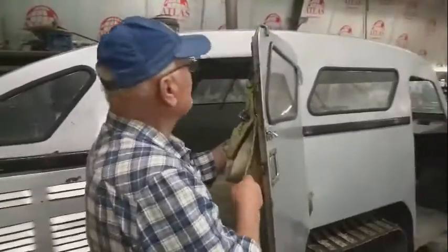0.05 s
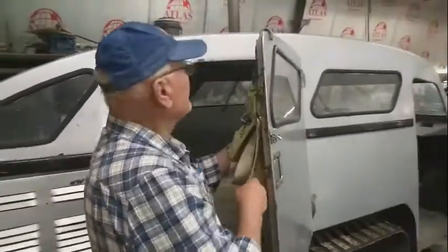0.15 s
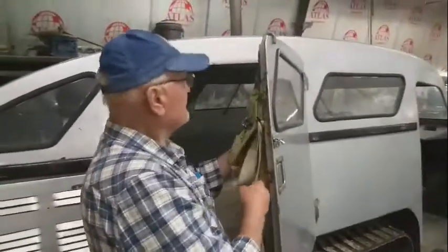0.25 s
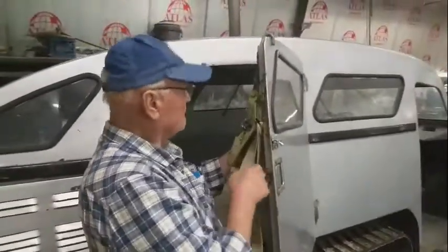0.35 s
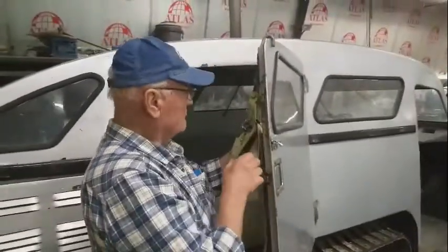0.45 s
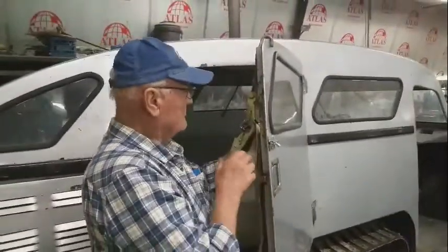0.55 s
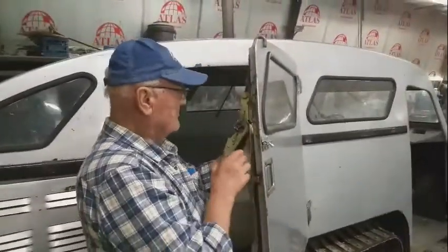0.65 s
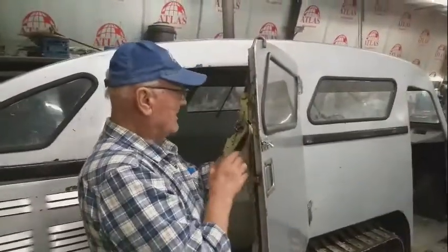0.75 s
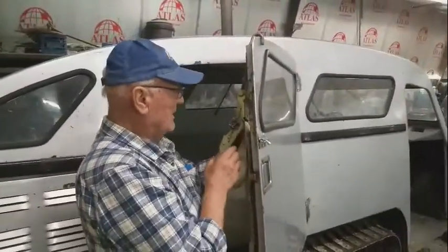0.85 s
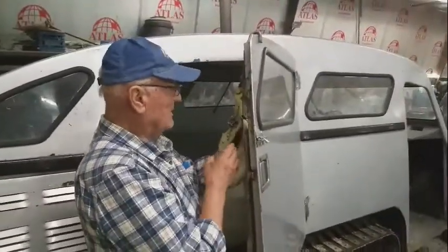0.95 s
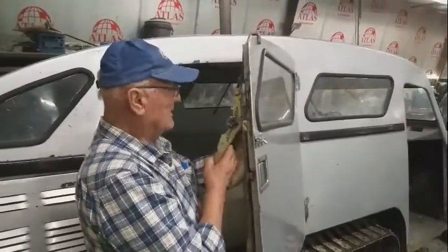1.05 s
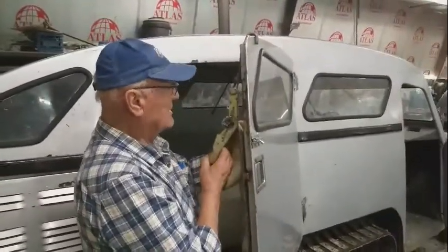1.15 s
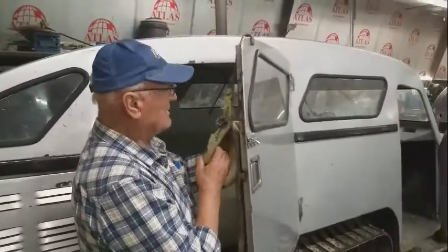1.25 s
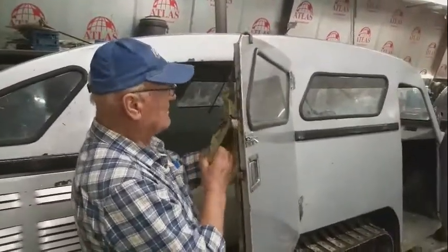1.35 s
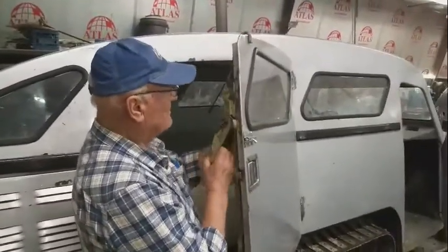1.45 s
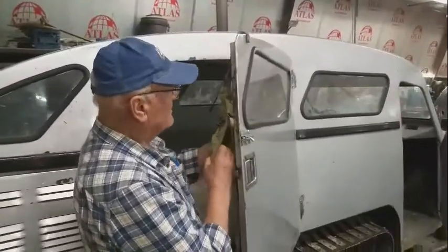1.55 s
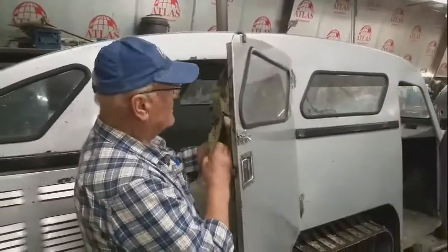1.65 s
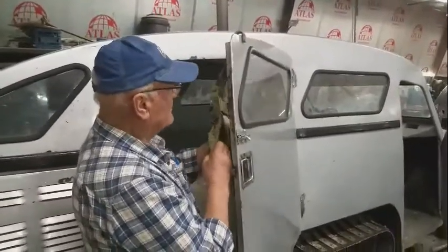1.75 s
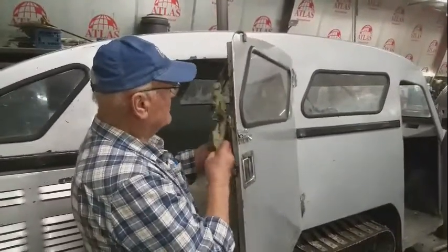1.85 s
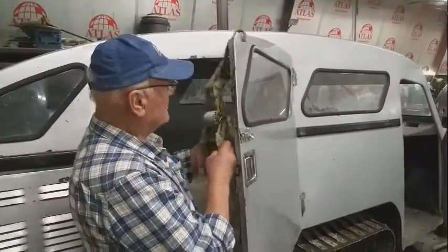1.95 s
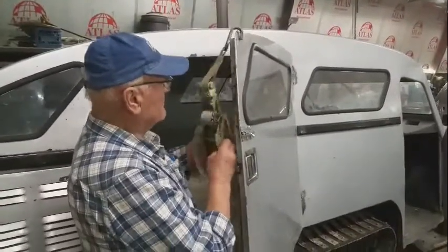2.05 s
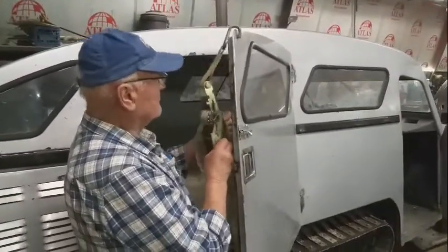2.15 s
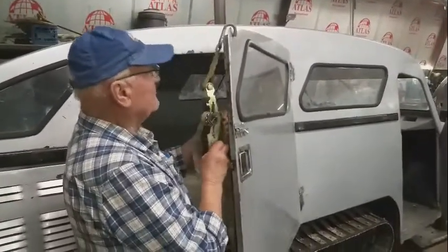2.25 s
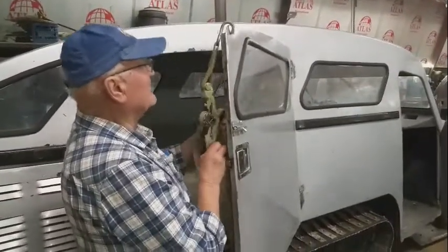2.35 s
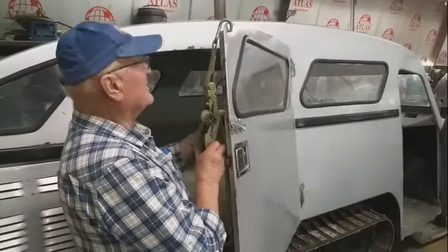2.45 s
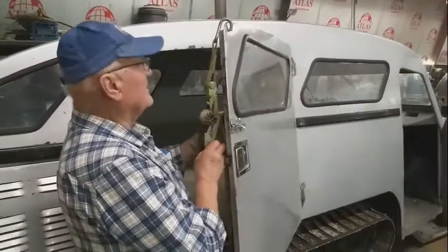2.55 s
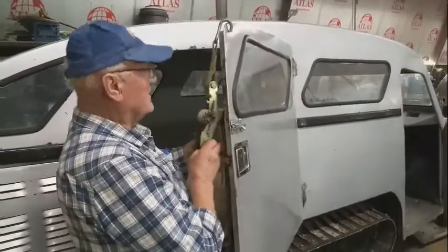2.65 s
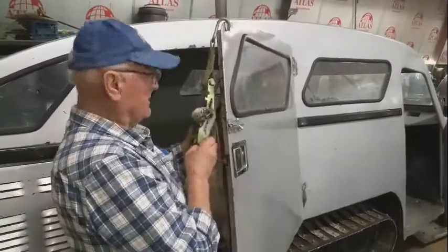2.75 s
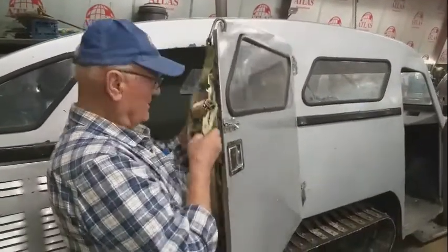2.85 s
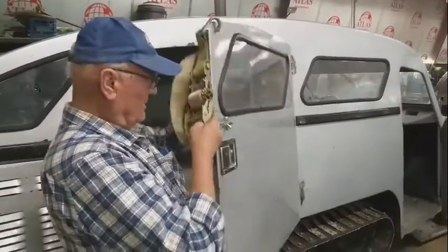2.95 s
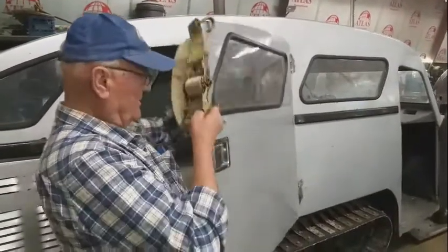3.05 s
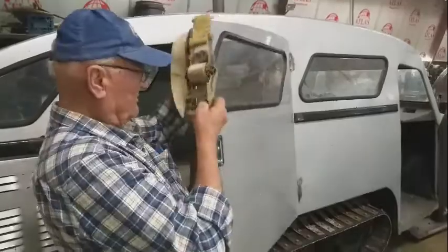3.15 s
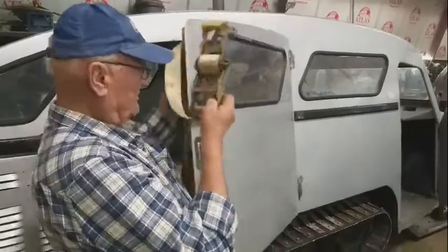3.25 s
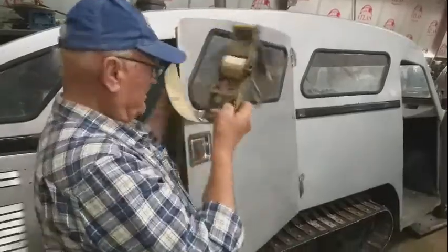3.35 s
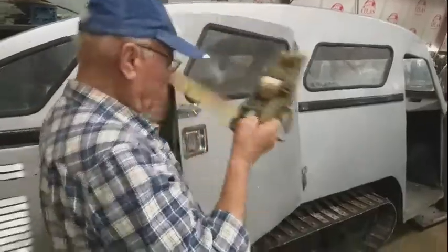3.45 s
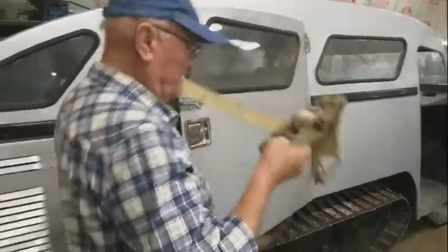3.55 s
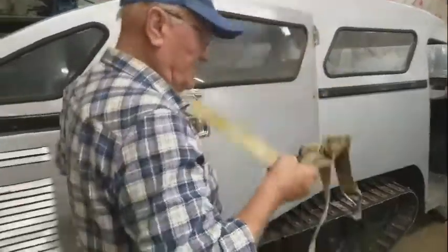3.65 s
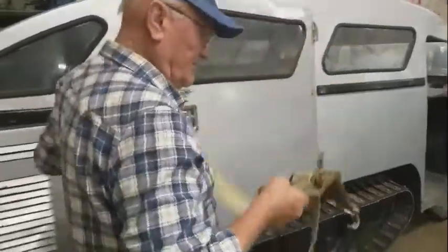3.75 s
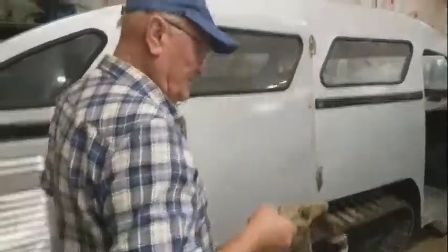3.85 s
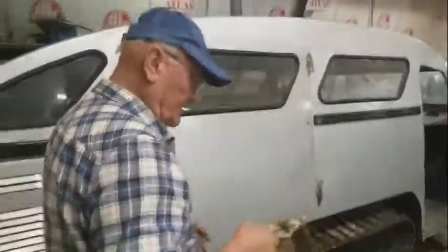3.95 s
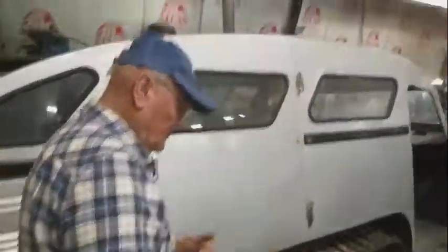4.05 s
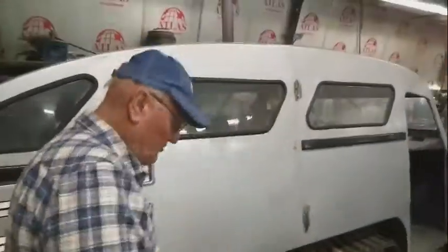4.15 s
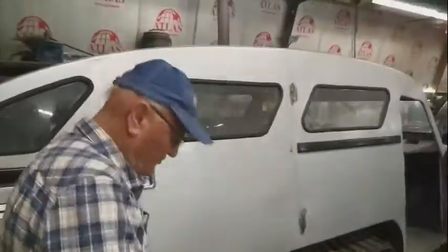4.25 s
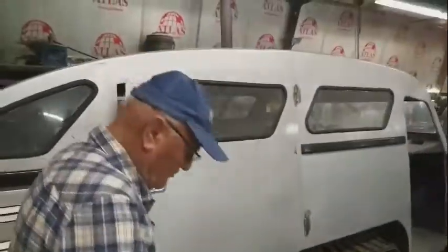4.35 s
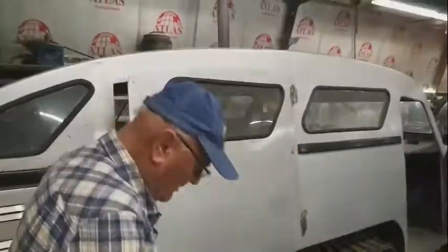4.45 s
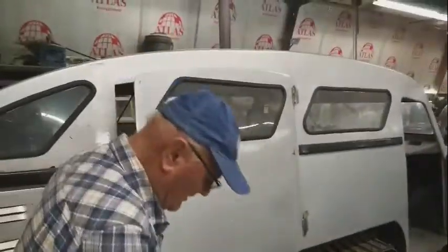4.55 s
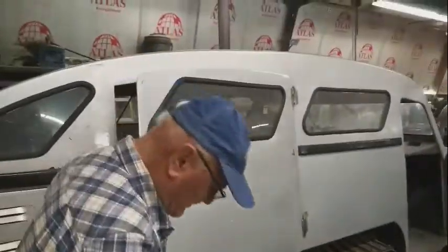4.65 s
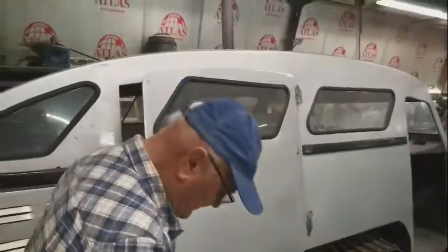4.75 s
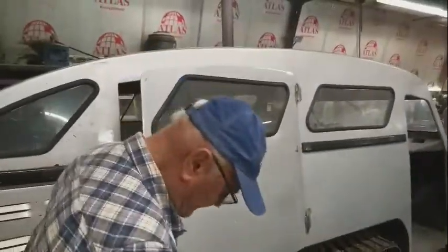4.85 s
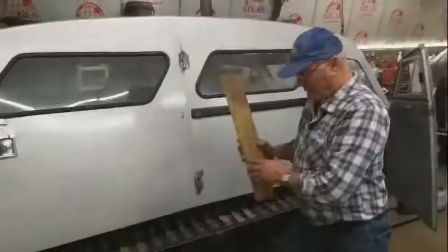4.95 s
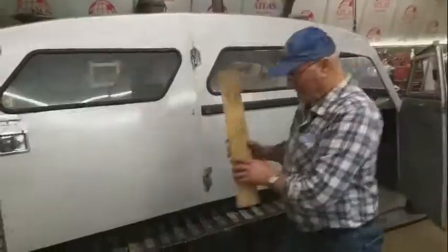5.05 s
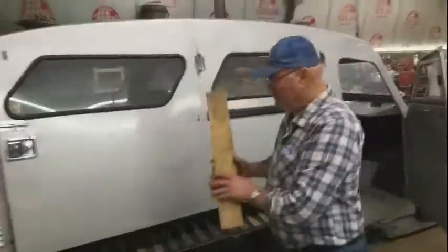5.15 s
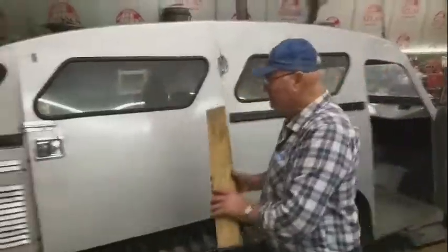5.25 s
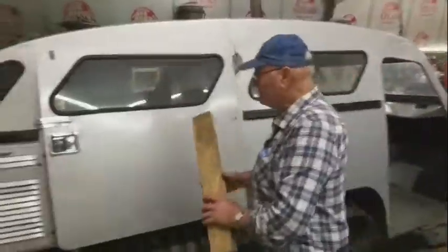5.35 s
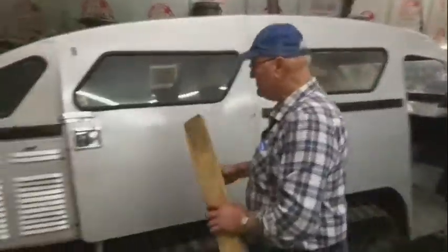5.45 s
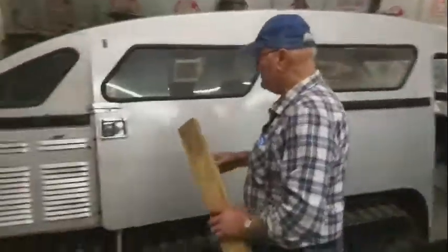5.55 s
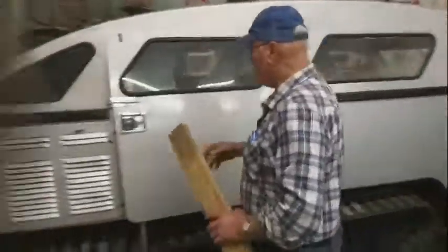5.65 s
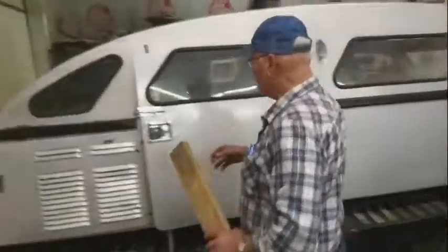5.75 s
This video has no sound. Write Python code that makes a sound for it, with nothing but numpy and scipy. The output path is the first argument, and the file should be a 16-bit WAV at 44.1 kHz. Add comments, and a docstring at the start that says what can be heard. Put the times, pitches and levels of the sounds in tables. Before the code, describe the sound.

Sharp ratchet clicks and metal clanks give way to a clattering, ringing steel hook, a brief dead silence, and faint clothes rustle.

```python
"""A workshop, where a ratchet strap is worked on the door of a tracked vehicle with a humming steel body.
The pawl snaps over the teeth as short damped tones, and the webbing drags and lets go as coloured noise.
Knocks of the ratchet on the body, then thuds as the hook lands, are noise rattles with ringing tones.
The strap is lifted off and its hook strikes and rings with uneven beats. After a short silent break
only the room, rustling clothes and soft scuffs are left, all made from shaped noise."""
import sys
import numpy as np
from scipy import signal
from scipy.fft import rfft, irfft
from scipy.io import wavfile
from scipy.ndimage import uniform_filter1d, minimum_filter1d

SR = 44100
rng = np.random.default_rng(int(sys.argv[2]) if len(sys.argv) > 2 else 0)


def materialize(psi):
    """Save the field psi as 16-bit PCM at rate SR to the path in sys.argv[1].

    A 1-D psi becomes a single channel; in a 2-D psi each row is a channel.
    """
    bounded = np.clip(np.atleast_2d(psi).T, -1, 1)
    quanta = np.round(bounded * 32767).astype(np.int16)
    wavfile.write(sys.argv[1], SR, quanta)


N = 255339
T = np.arange(SR) / SR  # seconds within one sound
CLOCK = np.arange(N) / SR  # seconds within the whole scene

# In the tables, t60 is the time to fade by 60 dB, and tone levels are relative.

# Tone of the quiet workshop. Each row: pitch in Hz, level in dB.
FLOOR_TONE = [(18, -80), (30, -16), (141, 1.5), (486, -18.5), (844, -21.5), (1320, -36), (1910, -13),
              (2480, -26), (4300, -17), (8080, -16.5), (9710, -27), (16000, -40)]
FLOOR_DB = -61.5
# How long the room rings, before scaling. Each row: pitch in Hz, t60 in seconds.
ROOM_T60 = [(100, 0.97), (250, 1), (600, 0.62), (1500, 0.51), (3000, 0.49), (6000, 0.32), (8500, 0.37),
            (15000, 0.033)]

# Soft scuffs of hands and shoes. Each row: start in seconds, level in dB, fade time in seconds.
SCUFFS = [(5.035, -57.5, 0.11), (5.166, -67.5, 0.029), (5.406, -55, 0.051)]
# Tone of the scuffs. Each row: pitch in Hz, level in dB.
SCUFF_TONE = [(300, -11), (1200, -8.5), (1800, 7.5), (2300, -3), (3000, -37), (9000, -31)]
# Webbing and sleeves brush past.
# Each row: middle in seconds, half length in seconds, level in dB, brightness in dB per octave.
RUBS = [(0.01, 0.082, -41, -2), (1.581, 0.0074, -43.5, 15.5), (1.676, .007, -51.5, 5),
        (2.06, 0.085, -45, 1.5), (3.427, 0.36, -50.5, -2), (3.647, 0.09, -43.5, -5),
        (3.79, 0.076, -51, 4.5), (3.903, 0.025, -45, 5.5), (3.994, 0.16, -51.5, 3),
        (4.696, 0.055, -48, 4.5), (5.021, 0.014, -54, 13), (5.095, 0.06, -58.5, 14), (5.193, 0.027, -51, 9),
        (5.369, 0.16, -56.5, 3.5), (5.79, 0.17, -53, 4)]
# Tone of the cloth before that brightness. Each row: pitch in Hz, level in dB.
CLOTH_TONE = [(150, -26), (300, -6), (800, -6.5), (1200, -6), (1800, 5), (2700, -2.5), (4000, 5.5),
              (6000, -3.5), (8200, 0), (10000, -19.5), (13000, -13), (16000, -21)]

# Steel panels of the body. Each row: pitch in Hz, level in dB, t60 in seconds before scaling.
PANELS = [(152, -18, .9), (176, -21, .7), (237, -22, .6), (260, -18, .95), (322, -21, .6), (411, -16, .6),
          (541, -15, .65), (677, -14, .6), (860, -19, .5), (1075, -20, .5), (1385, -19, .5),
          (1612, -17, .5), (1735, -18, .5)]
# The strap tugs at the body. Each row: start in seconds, end in seconds, level in dB.
PULLS = [(0.201, 1.639, -52.5), (2.146, 2.55, -46), (3.5, 3.776, -44), (3.796, 4.02, -54.5)]
# Tone of the panel hum. Each row: pitch in Hz, level in dB.
HUM_TONE = [(150, 0), (260, 0.5), (400, -10.5), (700, -15.5), (1500, -30.5)]

# The webbing drags round the spool, then lets go.
DRAG_FROM_S, DRAG_TO_S = 1.848, 1.962
DRAG_ATTACK_S, DRAG_RELEASE_S = 0.0094, 0.015
HISS_DB, HISS_DB_PER_S = -40, -38  # the spool hisses at once and eases off
GROAN_DB, GROAN_DB_PER_S = -29.5, 290  # the webbing groans ever louder up to this level
# Tone of the spool's hiss. Each row: pitch in Hz, level in dB.
HISS_TONE = [(1500, -17.5), (4000, -10), (7000, -15.5), (8300, 4.5), (9000, -13), (10000, -39.5),
             (16000, -31)]
# Tone of the webbing's groan. Each row: pitch in Hz, level in dB.
GROAN_TONE = [(60, -38), (250, -13), (600, -6.5), (1100, -7.5), (1900, -13), (3500, -19.5), (9000, -44)]

# Knocks of the ratchet on the body, then thuds as the hook lands on the track or floor.
# Each row: start in seconds, level in dB, hardness in dB per octave, boom in the bass in dB,
# length of the rattle in seconds before scaling.
KNOCKS = [(1.962, -14, -1, -9.5, 0.032), (1.985, -24, 1, 1.5, 0.0037), (2.824, -26.5, 0.5, -2.5, 0.00077),
          (2.844, -35, -7, -6, 0.014), (2.892, -26.5, 7, -10, 0.023), (2.898, -13.5, 0.9, 1, 0.0045),
          (2.922, -28.5, -2, -5, 0.015), (3.027, -26.5, -3, -3, 0.018), (3.101, -22.5, 1.27, -1.5, 0.0055),
          (3.483, -18.5, -0.7, -2, .05), (4.128, -27.5, 1, 11.5, 0.039), (4.422, -32.5, 5, -7, 0.013)]
# Tone of a knock or thud before hardness and boom. Each row: pitch in Hz, level in dB.
KNOCK_TONE = [(29, -69.5), (50, -37.5), (85, -22.5), (148, -7), (380, -4), (408, -9.5), (472, -8),
              (545, -3), (802, -6.5), (1430, -6), (2110, -8), (6870, -15.5), (8540, -13.5), (10100, -31.5),
              (16000, -29)]
PIVOT_HZ, HARD_TOP_HZ = 1500, 4300  # hardness tilts the tone about the pivot, up to its top
BOOM_HZ, BOOM_END_HZ = 300, 700  # the boom fades out between these
DEEP_HZ, DEEP_GROWTH = 80, 1.2  # the deepest bass follows the boom this many times as strongly
SOFT_RING, RING_LOSS = 1, 0.043  # ring time as a factor; how fast it shrinks per dB per octave of hardness
# The clack within each hook strike: dB against the strike, dB per octave, seconds before scaling.
CONTACT_DB, CONTACT_HARDNESS, CONTACT_S = -26.5, 9.14, 0.004

# The ratchet frame rings as it comes free. Each row: start in seconds, level in dB.
FRAME_RINGS = [(2.9, -58), (3.101, -41)]
# Tones of the frame. Each row: pitch in Hz, level in dB, t60 in seconds.
FRAME_MODES = [(3773, 1, 1), (4974, 12.5, 0.366), (6255, -16, 0.35), (7010, -34, 0.11), (8140, -5.5, 0.88),
               (12560, -7, 0.2)]
TING_S = 3.5
# The hook tings as it slips off the door. Each row: pitch in Hz, level in dB, t60 in seconds.
TING_MODES = [(5900, -32, 0.36), (8100, -34, 0.243)]

# Hook strikes. Each row: start in seconds, level in dB, place struck from 0 (tip) to 1 (shank),
# brightness in dB per octave.
STRIKES = [(4.014, 4.5, 0.17, 2.5), (4.136, -1.5, 0.4, -0.5), (4.368, 0, 1, 3), (4.532, -9, 1, 3)]
# Pitches at which the hook rings, each in Hz.
HOOK_HZ = [2055, 2530, 2660, 4113, 4662, 5114, 5553, 5914, 7536, 9082, 9497, 11012, 12660, 13510, 13730,
           14545, 14885]
# The same hook tones. Each row: dB when struck at the tip, dB when struck at the shank, t60 in seconds.
HOOK_MODES = [(-8.5, -15.5, 0.92), (-33.5, -17, 0.93), (-30.5, -23, 1), (-43.5, -48, 1.1), (-34, -30, 1.4),
              (-11.5, -9.5, 0.8), (-45, -32, 1.5), (-23.5, -17.5, 0.83), (-21.5, -16.5, 1.17),
              (-23.5, -27, 0.35), (-31, -33.5, 0.16), (-57, -35.5, 0.55), (-59, -45.5, .35),
              (-45.5, -39, 0.46), (-35.5, -49, .3), (-54, -47, 0.66), (-52, -47.5, .5)]
# Just after its third strike the hook's ringing fades faster.
# The row: start in seconds, extra loss in dB a second.
FASTER_FADE = (4.383, 43.4)

# The pawl drops on a tooth. Each row: start in seconds, strength in dB.
SNAPS = [(0.182, 5), (0.2764, -8), (0.364, -10.5), (0.4216, -8.5), (0.4581, -18.5), (0.505, -24.5),
         (0.543, -11.5), (0.581, -27.5), (0.6274, -15), (0.7121, -14), (0.7705, -26), (0.832, -13.5),
         (0.8903, -11.5), (0.9807, -10), (1.076, -9.5), (1.1806, -12), (1.253, -9), (1.3914, -22),
         (1.5735, -34), (1.6715, -61), (2.0005, -5), (2.271, -18.5), (2.3954, -19), (2.5114, -0.5),
         (2.6262, -1.5), (2.8985, -5), (3.032, -21.5)]
# Pawl resonances. Each row: middle pitch in Hz, nominal width in Hz, level in dB.
PAWL_MODES = [(2900, 690, -3), (4000, 970, 2), (5950, 2000, 2.5), (7120, 530, -2.5), (7520, 170, -7.5),
              (8267, 690, 10), (12600, 1500, -40.5)]
# Tone of the noise that follows each snap. Each row: pitch in Hz, level in dB.
SNAP_TONE = [(59, -38), (100, -24.5), (166, -6.5), (471, -9), (535, -0.5), (608, -8.5), (691, -4.5),
             (1100, -6.5), (1230, -6.5), (2750, 0), (5080, -7.5), (8110, -2), (10000, -20), (13500, -13),
             (16000, -15)]
# What each snap leaves ringing in the side plates. Each row: pitch in Hz, level in dB, t60 in seconds.
PLATES = [(1667, -20, .5), (1766, -21, .5), (2719, -18, .35), (2831, -14, .35), (3743, -16, .2),
          (3945, -13, .2), (7281, -9, .08), (8077, -6, .08), (8361, -4, .08)]
# Once the webbing has let go, a hand covers the pawl and dims its direct sound.
SHADED_FROM_S, SHADE_DB = 2.1, -5
WASH_DB, WASH_GROWTH = -21, 0.69  # ring after a snap of 0 dB; dB it gains per dB of strength
TOP_DB, FIRM_DB, TOP_LOSS = 3.5, -8.5, 1  # its top treble; below a firm snap it loses this many dB per dB

# What differs between the two microphone ports. Each row: pitch in Hz, dB against the middle.
PORT_GAP = [(100, -56.5), (600, -58), (1200, -28.5), (2050, -12), (3000, -30.5), (5100, -36.5), (7500, -24),
            (12000, -27)]
# How far the hook leans to the left. Each row: pitch in Hz, dB against the hook's ringing.
HOOK_LEAN = [(1000, -40.5), (2050, -18), (3000, -30), (5100, -52)]
# The sound drops out. The row: start in seconds, end in seconds.
BREAK = (4.855, 4.968)
EDGE_HZ = 16000  # upper edge of what is heard


def amp(db):
    """Turns decibels into a gain."""
    return 10 ** (np.asarray(db) / 20)


def unit(x):
    """Scales a sound to an average strength (rms) of 1."""
    return x / np.sqrt(np.mean(x ** 2) + 1e-20)


def read(points, hz):
    """Reads a table between its rows, on a logarithmic pitch axis as in hearing."""
    f, value = np.transpose(points)
    return np.interp(np.log(hz + 1), np.log(f + 1), value)


def add(mix, s, sound):
    """Mixes a sound in at time s, cut off at the end of the scene."""
    part = mix[max(round(s * SR), 0):][:len(sound)]
    part += sound[:len(part)]


def colour(x, tone):
    """Makes each pitch louder or softer by a table of (Hz, dB)."""
    hz = np.fft.rfftfreq(len(x), 1 / SR)
    return irfft(rfft(x) * amp(read(tone, hz)), len(x))


def noise(tone, size):
    """Random hiss shaped by a table of (Hz, dB), with rms 1."""
    return unit(colour(rng.standard_normal(size), tone))


def swell(seconds):
    """A gain that rises smoothly from 0 towards 1."""
    return 1 - np.exp(-T / seconds)


def die_away(x, factor=1):
    """Lets each pitch band fade with the decay of the workshop, its ring time scaled by factor."""
    hz, t, bands = signal.stft(x, SR, nperseg=256)
    t60 = factor * read(ROOM_T60, hz)[:, None]
    return signal.istft(bands * amp(-60 * t / t60), SR, nperseg=256)[1][:len(x)]


def ring(modes):
    """Struck metal as a sum of fading sine tones, from rows of (Hz, dB, t60)."""
    return sum(amp(db - 60 * T / t60) * np.sin(2 * np.pi * (hz * T + rng.random()))
               for hz, db, t60 in modes)


def catches(grain_db):
    """The uneven grip of sliding fabric, as a gain that wavers at random."""
    return amp(grain_db * unit(uniform_filter1d(rng.standard_normal(N), size=260)))


def workshop_floor():
    """The quiet workshop: steady shaped noise."""
    return amp(FLOOR_DB) * noise(FLOOR_TONE, N)


def scuffs():
    """Friction of hands and shoes: short dull noises that swell and fade."""
    out = np.zeros(N)
    for s, db, length in SCUFFS:
        add(out, s, amp(db) * noise(SCUFF_TONE, SR) * np.exp(-T / length) * swell(0.0043))
    return out


def rubbing():
    """Webbing and sleeves brush past: each rub is noise that swells and fades, roughened by small catches."""
    out = np.zeros(N)
    for s, half_length, db, bright_db in RUBS:
        tone = [(hz, level + bright_db * np.log2(hz)) for hz, level in CLOTH_TONE]
        cloth = np.resize(noise(tone, SR), N)  # one second of noise, repeated
        out += amp(db) * np.exp(-((CLOCK - s) / half_length) ** 2) * cloth
    return out * catches(grain_db=1.0)


def panel_hum(ring_share=0.45):
    """Small random jerks of the strap keep the low tones of the steel panels sounding."""
    out = np.zeros(N)
    panels = ring([(hz, db + read(HUM_TONE, hz), t60 * ring_share) for hz, db, t60 in PANELS])
    panels = panels / np.linalg.norm(panels)
    for start, end, db in PULLS:
        jerks = rng.standard_normal(round((end - start) * SR))
        add(out, start, amp(db) * signal.fftconvolve(jerks, panels))  # every jerk starts a ring
    return out


def drag():
    """The webbing slips round the spool: a metal hiss, and a groan that grows until it lets go."""
    age = np.clip(CLOCK, DRAG_FROM_S, DRAG_TO_S) - DRAG_FROM_S
    attack = 1 - np.exp(-age / DRAG_ATTACK_S)
    release = np.exp(-np.maximum(CLOCK - DRAG_TO_S, 0) / DRAG_RELEASE_S)
    hiss = amp(HISS_DB + HISS_DB_PER_S * age) * noise(HISS_TONE, N)
    time_left = DRAG_TO_S - DRAG_FROM_S - age
    groan = amp(GROAN_DB - GROAN_DB_PER_S * time_left) * noise(GROAN_TONE, N)
    return attack * release * (hiss + groan) * catches(grain_db=1.1)


def knock(hardness, boom_db, length, room_db=-5, panel_db=-1, rattle_db=-1, grit_db=4, rise=0.17,
          panel_ring=0.98):
    """A quick rattle of contacts with ringing panel tones and room; hard ones are brighter and die sooner."""
    hz = np.geomspace(20, 20000, 40)
    tilt_db = hardness * np.log2(np.minimum(hz, HARD_TOP_HZ) / PIVOT_HZ)
    boom = [(DEEP_HZ, DEEP_GROWTH * boom_db), (BOOM_HZ, boom_db), (BOOM_END_HZ, 0)]
    tone = np.column_stack([hz, tilt_db + read(boom, hz)])
    lasting = SOFT_RING * np.exp(-RING_LOSS * max(hardness, 0))

    # the strength of the contacts jumps every 40 samples
    grit = np.repeat(amp(grit_db * rng.standard_normal(SR)), 40)[:SR]
    contacts = unit(colour(rng.standard_normal(SR) * grit, KNOCK_TONE))
    rattle = colour(contacts, tone) * np.exp(-(T / (1.24 * length)) ** 2) * swell(rise * length)

    room = die_away(colour(noise(KNOCK_TONE, SR), tone), lasting) * swell(0.5 * length)
    modes = [(f, db + read(tone, f), t60 * lasting * panel_ring) for f, db, t60 in PANELS]
    panels = ring(modes) * swell(0.0074)
    return amp(rattle_db) * rattle + amp(room_db) * room + amp(panel_db) * panels


def knocks():
    """Knocks of the ratchet on the body, thuds as the hook lands on the track or floor, and hook clacks."""
    out = np.zeros(N)
    for s, db, hardness, boom_db, length in KNOCKS:
        add(out, s, amp(db) * knock(hardness, boom_db, length))
    for s, db, _, _ in STRIKES:
        add(out, s, amp(db + CONTACT_DB) * knock(CONTACT_HARDNESS, 0, CONTACT_S))
    return out


def coming_free():
    """Fading metal tones: the ratchet frame rings as it comes free, the hook tings as it slips off."""
    out = np.zeros(N)
    for s, db in FRAME_RINGS:
        add(out, s, amp(db) * ring(FRAME_MODES))
    add(out, TING_S, ring(TING_MODES) * swell(0.02))
    return out


def ringing_envelope(t, hz, tip_db, shank_db, t60):
    """Strength of one hook tone: energies of all strikes add up, and fade faster just after the third."""
    power, octaves = 0, np.log2(hz / HOOK_HZ[0])
    for s, db, place, bright_db in STRIKES:
        age = np.maximum(t - s, 0)
        blow_db = db + tip_db + place * (shank_db - tip_db) + bright_db * octaves
        power = power + (amp(blow_db - 60 * age / t60) * (1 - np.exp(-age / 0.0039))) ** 2
    faster_from_s, loss_db_per_s = FASTER_FADE
    return np.sqrt(power) * amp(-loss_db_per_s * np.maximum(t - faster_from_s, 0))


def hook(level_db=-1, swing_hz=13, echo_share=0.74, blur_db=-16):
    """The steel hook rings; as it swings, echoes slide against the direct sound and tones beat unevenly."""
    offset_hz = np.fft.fftfreq(SR, 1 / SR)
    out, start = np.zeros(N), STRIKES[0][0]
    for hz, mode in zip(HOOK_HZ, HOOK_MODES):
        shift_hz = swing_hz * np.sqrt(hz / HOOK_HZ[0])  # higher tones beat faster
        slow_beats = 1 / (1 + (offset_hz / shift_hz) ** 4)
        fast_beats = amp(blur_db) / (1 + (offset_hz / 70) ** 2)
        random_phase = np.exp(2j * np.pi * rng.random(SR))
        echoes = np.fft.ifft((slow_beats + fast_beats) * random_phase)
        echo_level = echo_share * (hz / HOOK_HZ[0]) ** 0.86
        paths = 1 + echo_level * echoes / np.std(echoes)
        # even out the slow changes, so beats move the energy about but keep its sum
        paths /= np.sqrt(uniform_filter1d(abs(paths) ** 2, size=5000))
        tone = (paths * np.exp(2j * np.pi * hz * T)).real
        add(out, start, amp(level_db) * ringing_envelope(T + start, hz, *mode) * tone)
    return out


def ping(hz, width):
    """A heavily damped resonance that swells and dies quickly; the wider it is, the shorter."""
    t = T[:800]
    age = np.pi * width * t
    return age ** 2 * np.exp(-1.4 * age) * np.sin(2 * np.pi * hz * (t - 0.001))


def pawl(snap_db=1.5, plate_db=-2, early_db=4, early_s=0.012, echo_db=-6, echo_s=0.003, spread=0.0033,
         same=0.86):
    """The sprung pawl drops on a tooth: a bright snap, a quick echo of it, and a wash of side plates and room."""
    out = np.zeros(N)
    paths = noise(SNAP_TONE, SR)  # most echo paths stay alike from snap to snap
    for s, strength_db in SNAPS:
        db = strength_db + SHADE_DB * (s > SHADED_FROM_S)
        snap = sum(amp(mode_db) * ping(hz * (1 + spread * rng.standard_normal()), width)
                   for hz, width, mode_db in PAWL_MODES)
        snap *= amp(db + snap_db) / abs(snap).max()
        add(out, s, snap)
        echo_delay_s = echo_s * (1 + 0.064 * rng.standard_normal())
        add(out, s + echo_delay_s, amp(echo_db) * snap)

        room = die_away(np.sqrt(same) * paths + np.sqrt(1 - same) * noise(SNAP_TONE, SR))
        top_db = TOP_DB - TOP_LOSS * max(FIRM_DB - db, 0)  # weak snaps have less top treble
        room = colour(room, [(9000, 0.0088), (11000, top_db)])
        room *= (1 + amp(early_db) * np.exp(-T / early_s)) / 2  # stronger at first
        wash = room + amp(plate_db) * ring(PLATES) / 2
        add(out, s, amp(WASH_DB + WASH_GROWTH * strength_db) * wash * swell(0.0069))
    return out


def scene():
    """All sources sit near the middle; the hook's lowest ring leans left. Strap work ends in the break."""
    working = CLOCK < BREAK[1] - 0.02
    ringing = hook() * working
    strap = (panel_hum() + drag() + knocks() + coming_free() + pawl()) * working
    middle = workshop_floor() + scuffs() + rubbing() + strap + ringing
    port_gap = signal.hilbert(colour(middle, PORT_GAP)).imag  # a small phase gap between the ports
    side = port_gap + colour(ringing, HOOK_LEAN)
    return np.array([middle + side, middle - side])  # left, right


def record(dry, low_cut_hz=35):
    """Bass cut, a fast limiter that holds peaks at full scale, the silent break, and the treble limit."""
    dry = signal.sosfilt(signal.butter(2, low_cut_hz, "high", fs=SR, output="sos"), dry)
    allowed = np.minimum(1 / (abs(dry).max(0) + 1e-9), 1)
    gain = uniform_filter1d(minimum_filter1d(allowed, size=300), size=300)
    outside_break = (CLOCK < BREAK[0]) | (CLOCK > BREAK[1])
    running = uniform_filter1d(outside_break.astype(float), size=90)  # soft edges
    treble_limit = signal.firwin(511, EDGE_HZ, window=("kaiser", 9), fs=SR)
    return signal.oaconvolve(dry * gain * running, treble_limit[None], "same")


dry = scene()
out = record(dry)
materialize(out)
```